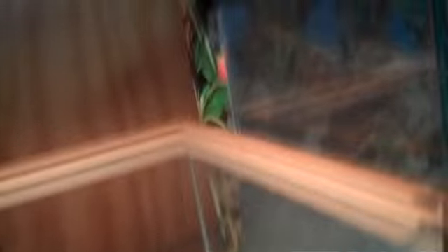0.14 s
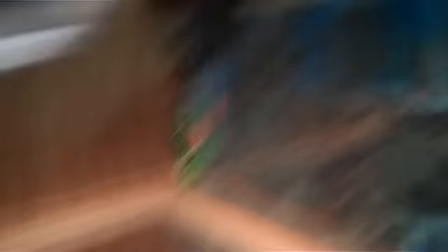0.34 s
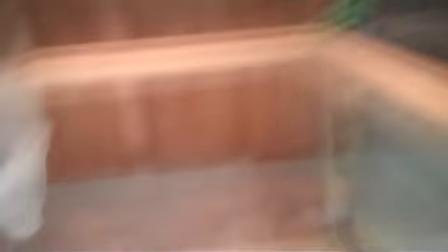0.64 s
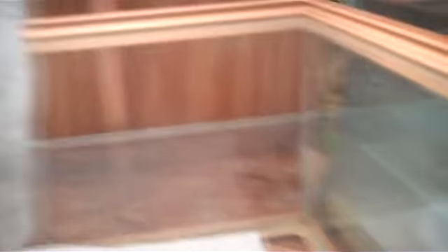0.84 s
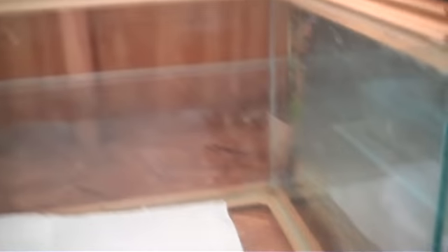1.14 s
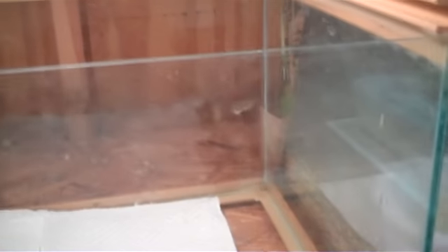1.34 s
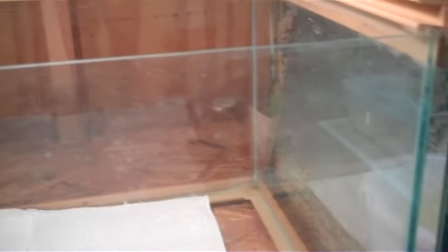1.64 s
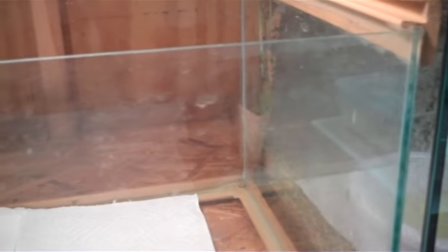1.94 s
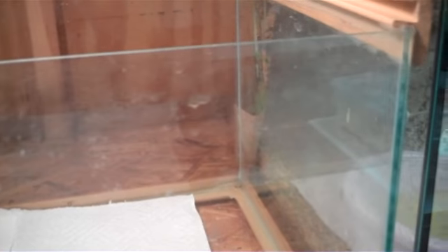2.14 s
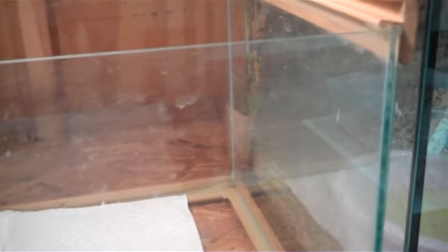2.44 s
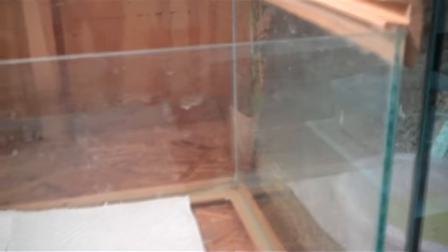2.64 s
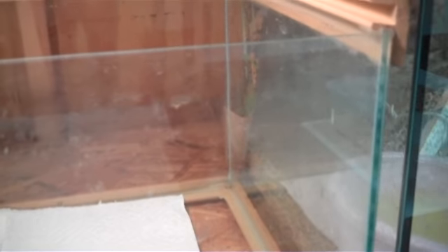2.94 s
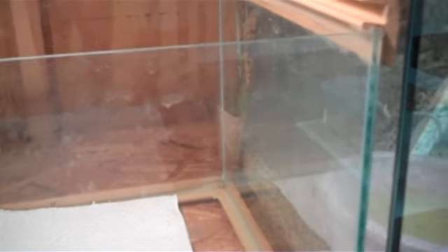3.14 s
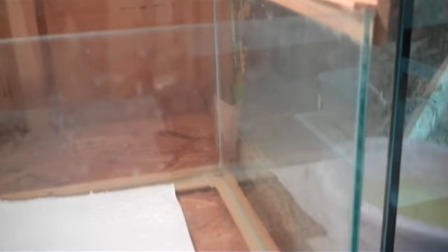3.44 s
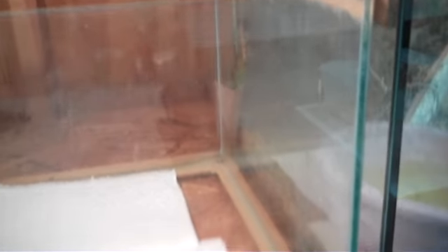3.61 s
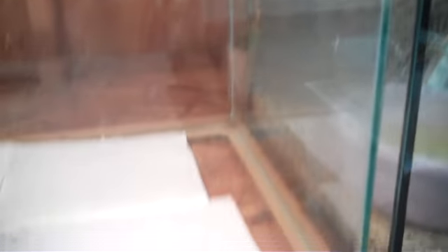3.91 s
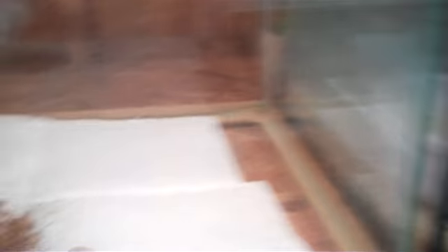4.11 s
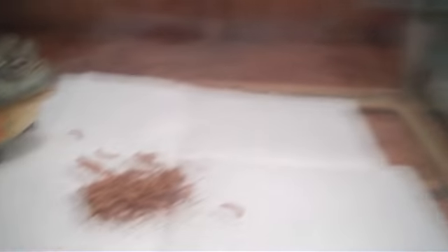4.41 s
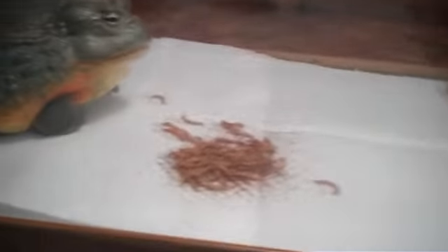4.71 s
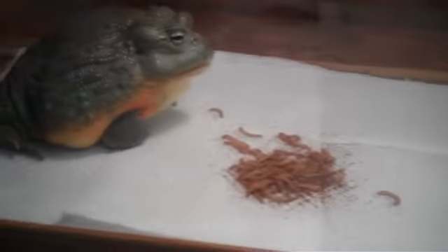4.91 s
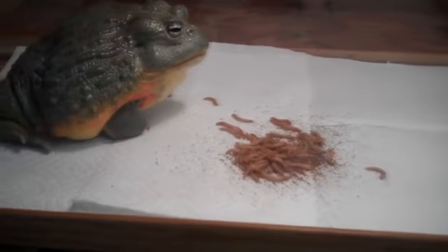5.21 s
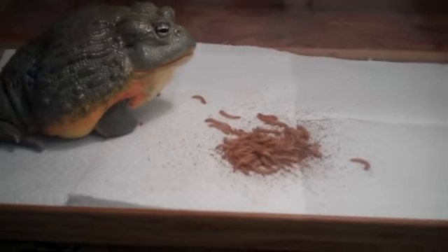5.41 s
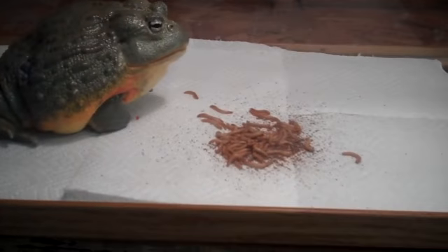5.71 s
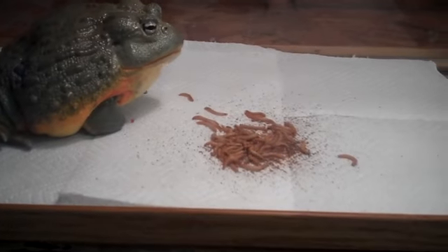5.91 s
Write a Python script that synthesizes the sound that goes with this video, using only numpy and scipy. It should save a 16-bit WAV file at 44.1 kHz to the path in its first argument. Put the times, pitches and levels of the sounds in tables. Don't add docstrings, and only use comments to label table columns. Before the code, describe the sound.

Brittle plastic crackling and soft hollow knocks, a grainy pouring rustle, then a burst of sharp crinkling and crunching close to a small camera.

```python
import sys
import numpy as np
from scipy import signal
from scipy.fft import rfft, irfft
from scipy.io import wavfile
from scipy.ndimage import uniform_filter1d, minimum_filter1d

SR = 44100
rng = np.random.default_rng(int(sys.argv[2]) if len(sys.argv) > 2 else 0)


def ratio(d):
    e = np.asarray(d, float) / 20
    return 10 ** e


def to_wav(s):
    ch = np.atleast_2d(s).T
    pcm = np.round(np.clip(ch, -1, 1) * 32767)
    wavfile.write(sys.argv[1], SR, pcm.astype(np.int16))


N = 267246
SIDES = np.array([[1], [-1]])

# time_s, left_re_right_db
PLACE = [(0, -5.5), (.4, -2.5), (1.2, -0.5), (3.4, -1), (3.75, -1), (4.0, -0.1), (4.4, -2.5), (5.0, -3),
         (6.06, -2.5)]
# time_s, lead_us
LEAD = [(0, 68), (.35, 60), (.6, 10), (3.4, 10), (3.6, 68), (3.8, 66), (3.9, 28), (4.35, 30), (4.42, -8),
        (4.7, -5), (4.75, -35), (4.9, -40), (5.1, 0), (6.06, 0)]
# time_s, rustle_db, dullness_db
FLOW = [(0, -62, -3.5), (.065, -44.5, 5.5), (.29, -43, -2.5), (.36, -47.5, 1), (.52, -51, 1),
        (.88, -51.5, 1), (1.44, -47.5, 0.7), (1.75, -40.5, 1), (2.01, -34.5, 2.5), (2.3, -37.5, 1),
        (2.68, -47.5, -1), (3.4, -56.5, 1.5), (3.63, -44, 5), (4.25, -45.5, 3), (4.8, -35, 6.5),
        (5.5, -41, 4.5), (5.74, -61, 4), (5.98, -71, 3)]


def evened(x):
    return x / np.sqrt(np.mean(x ** 2) + 1e-20)


def read(points, hz):
    f, value = np.transpose(points)
    return np.interp(np.log(hz + 1), np.log(f + 1), value)


def follow(points, s):
    return np.interp(s, *np.transpose(points))


def highpass(x, hz):
    return signal.sosfilt(signal.butter(2, hz, "high", fs=SR, output="sos"), x)


def add(mix, s, sound):
    part = mix[:, round(s * SR):][:, :sound.shape[1]]
    part += sound[:, :part.shape[1]]


def coloured(x, level_db):
    # freq_hz, likeness
    likeness = [(30, .6), (130, .72), (640, .93), (1500, .95), (3100, .68), (6800, .3), (15000, .4)]
    hz, t, z = signal.stft(x, SR, nperseg=512, noverlap=384)
    same = np.clip(read(likeness, hz), -1, 1)[:, None]
    z = np.array([z[0], same * z[0] + np.sqrt(1 - same ** 2) * z[1]])
    z = z * ratio(level_db(hz[:, None], t))
    return signal.istft(z, SR, nperseg=512, noverlap=384)[1][:, :N]


def ring(t, hz, t60, kick):
    mode = ratio(-60 * t / t60) * np.sin(2 * np.pi * hz * t)
    x = np.convolve(kick, mode)[:len(t)]
    return x / abs(x).max()


def arrive(s, sound, lead_us):
    hz = np.fft.rfftfreq(sound.shape[1], 1 / SR)
    shift = np.exp(1j * np.pi * hz * 1e-6 * lead_us * SIDES)
    early = 8
    return s - early / SR, irfft(rfft(np.roll(sound, early, axis=1)) * shift, sound.shape[1])


def snap(s, peak_db, hz, body_db, pan_db):
    t, luck = np.arange(700) / SR, rng.random(3)
    noise = rng.standard_normal((4, len(t)))
    bright = min(0.48 + hz / 7500, 1.2)
    kick = noise[0] * ratio(-60 * t / .0035) * np.minimum(t / .0003, 1)
    brittle = noise[3] * ratio(-60 * t / 0.0022)
    edge = np.diff(kick + 0.94 * brittle, n=2, prepend=[0, 0])
    tick = .12 * bright * edge + .3 * kick + .7 * ring(t, hz, 7.5 / hz, kick[:40])
    body = ring(t, min(hz, 1900 + 1300 * luck[0]), .0024, kick[:30])
    body = body + .4 * ring(t, 1200 + 900 * luck[1], .003, kick[:30])
    thump = ring(t, 600 + 500 * luck[2], 0.01, kick[:30])
    chatter_shape = ratio(-14.0 - 60 * t / 0.015) * np.minimum(t / 0.0008, 1)
    chatter = np.diff(noise[1:3], prepend=0) * bright * chatter_shape
    aim = ratio(.5 * SIDES * pan_db)
    sound = aim * (tick + chatter) + aim ** 0.55 * ratio(body_db - 3.0) * (body + ratio(-13.5) * thump)
    return s - .0006, ratio(peak_db - 4.0) * sound


def effort_db(t):
    # start_s, level_db
    jolts = [(0.174, -34), (0.302, -37.5), (.645, -43.5), (3.487, -48), (3.669, -30), (3.756, -28.5),
             (3.911, -34), (4.26, -35.5), (4.345, -29.5), (5.162, -31), (5.389, -33)]
    # middle_s, level_db, length_s
    squeezes = [(0.762, -49.5, 0.27), (1.02, -43.5, 0.33), (1.203, -54, 0.33), (2.838, -48, 0.18),
                (3.826, -37.5, 0.1), (4.052, -39.5, 0.78), (4.133, -26.5, 0.13), (4.414, -30.5, 0.2),
                (4.523, -32, 0.23), (4.653, -35, 0.053), (4.721, -27.5, 0.16), (4.885, -28, 0.058),
                (5.012, -30.5, 0.1), (5.187, -38.5, 0.78), (5.594, -36, 0.44), (5.845, -39, 0.33),
                (6.06, -42.5, 0.16)]
    rise_s, fall_db_per_s = 0.011, 237
    depth_db = 25
    power = ratio(2 * np.interp(t, *np.transpose(FLOW)[:2]))
    for s, db in jolts:
        onset = np.clip((t - s) / rise_s + 1, 0, 1) ** 2
        power = power + onset * ratio(2 * (db - fall_db_per_s * np.maximum(t - s, 0)))
    for s, db, length in squeezes:
        off_middle = np.minimum(abs(t - s) * 2 / length, 9)
        power = power + ratio(2 * (db - depth_db * off_middle ** 2.22))
    return 10 * np.log10(power)


def creases():
    start_s, creases_per_s = 3.65, 80
    luck = rng.random((400, 4))
    s = start_s + np.cumsum(-np.log(luck[:, 0])) / creases_per_s
    peak_db = effort_db(s) + 0.5 * np.log(luck[:, 1])
    rows = np.transpose([s, peak_db, 2500 + 5000 * luck[:, 2], -25 + 25 * luck[:, 3]])
    return rows[s < N / SR]


def snaps(tub):
    # time_s, snap_peak_db, ring_hz, wall_body_re_snap_db
    buckles = [(.028, -31, 1500, 14.5), (.0555, -37, 2150, 7), (.084, -29, 5670, 7), (.1045, -29, 5950, -17),
               (.1399, -32, 1940, 3), (.17, -10, 6250, -2), (.1827, -9.5, 5960, -1), (.2145, -19, 6800, 3.5),
               (.2526, -28.5, 5800, -17), (.2597, -31.5, 5560, 11.5), (.313, -9.5, 6700, -38),
               (.322, -20, 5000, -18), (.641, -23, 7240, -12), (.6455, -22.5, 7100, -15),
               (.712, -33, 2580, 3), (.9871, -33, 1930, 7.5), (1.11, -29.5, 3730, -34),
               (1.1745, -19, 7140, -1), (1.2942, -27.5, 4600, -8), (1.2975, -32.5, 4300, -5),
               (1.3005, -35.5, 1300, 5), (.9395, -43, 1500, 4), (.913, -43, 1800, 4), (1.663, -35, 2800, 5),
               (1.7373, -35, 1290, 11), (2.0033, -25, 7190, -1), (2.6383, -29.5, 3240, 5),
               (3.2011, -37, 3000, -12),
               (3.486, -28, 2820, 11.5), (3.536, -20, 3440, -32), (3.644, -21.5, 7100, -14),
               (3.668, -21, 7150, -11), (3.751, -35, 4830, 8.5), (3.755, -4, 7000, -42),
               (3.797, -23, 6300, -24), (3.8154, -19, 7700, -27), (3.8735, -25, 7350, -13),
               (3.9076, -9.5, 6740, -39), (3.9967, -12.5, 8060, -37), (4.0321, -19.5, 3350, 3.5),
               (4.045, -13, 8800, -22), (4.0538, -17, 7450, -13), (4.063, -23.5, 2500, 6.5),
               (4.0837, -21, 6760, -7), (4.1045, -14.5, 4400, -8), (4.11, -22.5, 4900, 7),
               (4.142, -13, 4830, -1), (4.187, -15.5, 7850, 1), (4.226, -38, 4850, 3),
               (4.2574, -22, 7440, 0), (4.2788, -15.5, 7500, 1), (4.3095, -23, 7360, 5.5),
               (4.3293, -18.5, 3320, 0), (4.338, -16, 8300, -29), (4.3442, -4, 7760, -16),
               (4.3445, -14, 7130, -15),
               (4.392, -19, 3920, -15), (4.396, -9.5, 3630, -13), (4.4164, -7.5, 3370, -24),
               (4.424, -6.5, 6400, -13), (4.432, -12.5, 8200, 1), (4.4385, -16, 2720, -31),
               (4.465, -27, 4700, -25), (4.4885, -13, 3970, -37), (4.501, -11.5, 5230, -42),
               (4.5161, -12, 5230, -36), (4.5468, -11.5, 5430, -38), (4.557, -10.5, 3000, -26),
               (4.5973, -26, 4570, -1), (4.6097, -22, 7250, -11), (4.644, -17.5, 4230, -31),
               (4.6579, -12, 6000, -42), (4.698, -17, 7900, -4), (4.7267, -20, 1470, 2),
               (4.7512, -16.5, 4700, 4.5), (4.809, -19, 7800, 2.5), (4.8302, -18, 6800, -32),
               (4.8492, -18, 1360, -24), (4.876, -20.5, 5740, -21), (4.918, -36, 5300, -3),
               (4.944, -32, 2580, -4), (4.968, -41, 3500, -12), (4.986, -18, 1420, -23),
                (5.014, -16, 3000, -20), (5.0734, -11, 2480, -30), (5.0803, -16, 6400, -12),
                (5.13, -23.5, 5860, -14), (5.162, -11, 3900, -13), (5.1745, -16, 6040, -26),
                (5.2648, -16.5, 3740, -6), (5.321, -23, 6350, -28), (5.3851, -23.5, 5750, -29),
                (5.3963, -19.5, 3200, -35), (5.4456, -20, 3480, -33), (5.489, -39, 5570, -23),
                (5.564, -27, 5150, -27), (5.6424, -26.5, 5200, -23), (5.8, -24, 4100, -33),
                (5.826, -33, 5700, -30), (5.887, -23, 7400, -6),
               (0.052, -44, 4130.0, -6), (0.248, -21.5, 1030.0, -8), (0.2885, -28, 5510.0, -8),
                (0.307, -23, 5680.0, -20), (0.3106, -17, 6370.0, -4.5), (1.1102, -23.5, 3500, -16),
                (1.3554, -35, 5200, -2), (1.533, -38, 2410.0, -14), (1.5428, -34, 5000.0, -2),
                (1.7428, -23, 3080, -12), (1.9304, -40, 3790.0, -12), (.878, -41, 3000.0, -4),
                (3.014, -38.5, 4310.0, -17), (3.03, -40, 4600.0, -18), (3.4494, -41, 4130.0, -17),
                (3.5357, -25, 3260, -20), (3.546, -30, 4310.0, -6), (3.6442, -29, 6720.0, 0),
                (3.6676, -15.5, 2250, -3.5), (3.6988, -25, 3100.0, -8), (3.8108, -22.5, 3470, -12),
                (4.0311, -19, 3620.0, -24), (4.108, -15, 4800, -4), (4.2275, -31.5, 4820.0, 6),
                (4.3037, -31, 4130.0, -14), (4.322, -21.5, 3960.0, -3), (4.4412, -15, 3620.0, -18),
                (4.457, -25, 4130.0, -12), (4.463, -32, 4480.0, -12), (4.522, -7.5, 2700, -30),
                (4.5631, -20, 4480.0, -10), (4.6211, -35, 5680.0, -12), (4.664, -19, 4900, -12),
                (4.6865, -29, 3300, -8), (4.905, -23, 4050, -12), (4.944, -34, 2600, -10),
                (4.9677, -20, 3470, -13), (5.124, -19.5, 3050, -9), (5.2118, -36, 3270.0, -16),
                (5.2918, -25, 2580.0, -12), (5.396, -31, 2900, -22), (5.4154, -26, 4310.0, -15),
                (5.4344, -21, 3790.0, -19), (5.4887, -25.5, 4480.0, -19), (5.509, -28, 4310.0, -2),
                (5.7637, -38, 4650.0, -1), (5.8622, -41, 3960.0, -12), (5.991, -38, 2980.0, -8)]
    pan_spread_db, lead_spread_us = 2, 12
    for row in [*buckles, *creases()]:
        side = rng.standard_normal()
        sound = snap(*row, follow(PLACE, row[0]) + pan_spread_db * side)
        add(tub, *arrive(*sound, follow(LEAD, row[0]) + lead_spread_us * side))


def needle(s, peak_db):
    t60_s, low_hz = 0.0019, 15100
    t = np.arange(200) / SR
    top = highpass(rng.standard_normal((2, len(t))) * ratio(-60 * t / t60_s), low_hz)
    return s - .0005, ratio(peak_db) * top / abs(top).max()


def needles(tub):
    # time_s, peak_db
    cracks = [(0.1709, -17), (0.1831, -2), (0.215, -19.5), (.641, -18), (1.175, -18), (3.6441, -16),
              (3.67, 0), (3.7564, -15), (3.9984, -14), (4.0445, -7), (4.2796, -26), (4.6095, -22),
              (4.876, -6), (5.6417, -14), (.313, -36), (5.625, -38), (5.655, -28), (5.765, -35),
              (5.778, -37), (4.34, -13), (4.424, -18), (4.501, -15)]
    for row in cracks:
        add(tub, *needle(*row))


def scrape(s, level_db, hz, length):
    sag, q, fade_db, slips_per_s = 0.33, 1.96, -10, 1500
    t = np.arange(3000) / SR
    u = np.minimum(t / length, 1)
    size = ratio(3.7 * rng.exponential(1, len(t)))
    slipping = rng.random(len(t)) < slips_per_s / SR
    slips = rng.standard_normal(len(t)) * (0.29 + size * slipping)
    turn = np.exp(2j * np.pi * np.cumsum(hz * (1 + sag * (.5 - u))) / SR)
    r = np.exp(-np.pi * hz / q / SR)
    x = (turn * signal.lfilter([1], np.convolve([1, -r], [1, -r]), slips / turn)).real
    shape = np.minimum(t / 0.0012, 1) * ratio(fade_db * u - 6100 * np.maximum(t - length, 0))
    return s, ratio(level_db) * evened(x) * shape * np.ones((2, 1))


def scrapes(tub):
    # start_s, level_db, centre_hz, length_s
    drags = [(0.051, -32.5, 2130, 0.02), (0.105, -55, 5670, 0.042), (0.31, -44, 5000, 0.01),
             (0.837, -59.5, 4500, 0.012), (1.655, -44.5, 2580, .025), (1.925, -54, 2400, .02),
             (1.994, -47, 2280, 0.039), (2.075, -46, 2500, .045), (2.17, -45, 2180, 0.059),
             (2.297, -50, 2300, .04), (3.183, -52, 2450, .012), (3.488, -49.5, 2470, 0.024),
             (4.04, -41, 7000, .005), (4.107, -32, 2120, 0.045), (4.15, -34, 5450, 0.0057),
             (4.26, -32, 3460, 0.0091), (4.344, -28.5, 2280, 0.011), (4.41, -34, 3500, .008),
             (4.722, -44, 1410, 0.026), (4.981, -37, 1310, .015), (5.205, -44, 2960, 0.043),
             (5.438, -44, 3000, 0.029), (5.579, -42, 3180, 0.043), (5.821, -48.5, 5570, 0.027),
             (0.224, -55, 5500, .06), (5.05, -40, 1290, 0.055), (5.389, -50, 1270, 0.056)]
    for row in drags:
        add(tub, *arrive(*scrape(*row), follow(LEAD, row[0])))


def rustle():
    # freq_hz, level_db
    grain = [(80, -36), (130, -9), (220, -4), (400, 2.5), (1000, -2.5), (1600, -3.5), (2300, 1), (3200, -1),
             (4300, -1), (5500, -3.5), (7500, -6), (11000, -4.5), (12300, 1), (14400, -3), (15300, -36)]
    # freq_hz, lift_db
    dull = [(600, 0.79), (1500, 1.5), (3500, -0.1), (7000, -0.7), (14000, -2)]
    # freq_hz, level_db
    pouring = [(150, 7.5), (500, 1), (1500, 1), (2250, 1.5), (3300, -2.5), (4400, -1.5), (5700, -5),
               (7500, 2.5), (9000, -0.55)]
    # freq_hz, level_db
    squeezed = [(800, -2.5), (1250, 0.5), (1900, -3), (3300, 2), (5000, -2.5), (7500, 1.5)]
    poured_s = 3.45
    s, _, dull_db = np.transpose(FLOW)
    t = np.arange(N) / SR
    coarse_db = np.interp(t, [3.3, 3.6], [2.2, 3.5])
    size = ratio(coarse_db * np.minimum(rng.exponential(1, N), 4.5))
    clicks = size * (rng.random(N) < 3500 / SR)
    clumps = ratio(2.07 * evened(uniform_filter1d(rng.standard_normal(N), 700)))
    decay = ratio(-120 * np.arange(400) / SR / .0035)
    power = signal.oaconvolve((clicks * clumps) ** 2, decay)[:N]
    power = np.where(t < poured_s, .5, .15) + power / uniform_filter1d(power, 3000)
    x = np.sqrt(abs(power)) * rng.standard_normal((2, N))
    patches = uniform_filter1d(rng.standard_normal((257, N // 128 + 9)), 6, 0)
    patches = evened(uniform_filter1d(patches, 12, 1))

    def field(hz, at_s):
        notes = np.where(at_s < poured_s, read(pouring, hz), read(squeezed, hz))
        dulled = read(dull, hz) * np.interp(at_s, s, dull_db)
        patchy = np.where(at_s < poured_s, 1.8, 2.3) * patches[:, :len(at_s)]
        return read(grain, hz) + notes + dulled + patchy

    level_db = effort_db(t) - 4.0 + .55 * SIDES * follow(PLACE, t)
    return coloured(x, field) * ratio(level_db)


def knock(s, peak_db, hz, cycles=12):
    t = np.arange(2600) / SR
    push = np.sin(2 * np.pi * hz * t[:130]) + .2 * rng.standard_normal(130)
    push = push * np.hanning(130)
    sound = ring(t, hz, cycles / hz, push) + 1.24 * ring(t, 1.8 * hz, 6 / hz, push)
    return s + 0.00614, ratio(peak_db - 5.0 - 0.38 * follow(PLACE, s) * SIDES) * sound


def knocks(low):
    # time_s, peak_db, ring_hz
    blows = [(0.0205, -25, 620), (0.109, -36, 700), (0.0765, -22.5, 770), (0.126, -30.5, 980),
             (0.176, -17.5, 890), (0.187, -40, 900), (0.209, -22.5, 890), (0.25, -24.5, 284),
             (0.26, -27, 234), (0.306, -34.5, 122), (0.53, -34, 620), (0.706, -37, 1160),
             (0.934, -32.5, 746), (0.979, -37, 1160), (1.073, -39, 640), (1.168, -32.5, 660),
             (1.3, -43, 685), (1.732, -46, 1070), (1.828, -41, 656), (2.06, -31.5, 596), (2.19, -42, 1940),
             (2.13, -31, 393), (2.2, -34.5, 614), (2.33, -33, 413), (2.569, -37.5, 530),
             (3.477, -28.5, 790), (3.657, -45, 1110), (3.75, -54, 1090), (3.9, -33, 710), (4.263, -28, 800),
             (4.428, -50, 1100), (4.558, -49, 816), (4.731, -38, 1110), (5.153, -30, 1050)]
    # time_s, peak_db, ring_hz, ring_cycles
    booms = [(0.021, -32.5, 262, 6.7), (0.08, -35, 298, 6), (0.165, -23.5, 1460, 9), (2.089, -46, 151, 10),
             (2.22, -48, 161, 10), (2.343, -34, 735, 82), (1.828, -47, 675, 32), (2.022, -32.5, 700, 22),
             (4.721, -30, 1300, 40), (4.99, -42, 1340, 40), (5.049, -35, 1280, 40)]
    for row in [*blows, *booms]:
        add(low, *knock(*row))


def tank(x):
    # freq_hz, t60_s
    tank_decay = [(300, 0.087), (1500, 0.038), (5000, 0.046), (12000, 0.016)]
    taps = np.zeros((2, 8192))
    places = np.arange(60, 8160, 20) + rng.integers(0, 20, (2, 405))
    np.put_along_axis(taps, places, rng.choice([-1., 1.], places.shape), 1)
    hz, t, z = signal.stft(taps, SR, nperseg=128)
    tail = signal.istft(z * ratio(-60 * t / read(tank_decay, hz)[:, None]), SR, nperseg=128)[1]
    return signal.fftconvolve(x, tail / np.linalg.norm(tail[0]), axes=1)[:, :N]


def room_tone():
    # time_s, level_db
    hands = [(0, -58.5), (.05, -58.5), (.18, -38.5), (.31, -51), (.42, -59.5), (.9, -56.5), (1.5, -59.5),
             (2.2, -57), (2.5, -61), (3.1, -60.5), (3.6, -57), (3.9, -53), (4.15, -51), (4.36, -53),
             (4.43, -54.5), (4.52, -58.5), (5.3, -63), (6.06, -57.5)]
    # freq_hz, density_db_per_hz
    hum = [(15, -57), (35, -19), (75, 0.5), (160, -5.5), (250, 5), (340, 2.5), (430, -3.5), (700, -6),
           (1500, -16.5), (4000, -53)]
    t = np.arange(N) / SR
    lumps = uniform_filter1d(rng.standard_normal(N // 128 + 9), 12)
    lumps = evened(uniform_filter1d(lumps, 8))

    def field(hz, at_s):
        return read(hum, hz) + 3.5 * lumps[:len(at_s)] * (hz < 300)

    x = coloured(rng.standard_normal((2, N)), field)
    return evened(x) * ratio(follow(hands, t) + 5.5 - 0.7 * follow(PLACE, t) * SIDES)


def air():
    level_db, low_hz = -72, 9500
    return ratio(level_db) * highpass(rng.standard_normal((2, N)), low_hz)


def scene():
    tub, low = np.zeros((2, 2, N))
    snaps(tub)
    needles(tub)
    scrapes(tub)
    knocks(low)
    tub = low + highpass(tub, 450)
    return tub + ratio(-10) * tank(tub) + rustle() + room_tone() + air()


def causal(points):
    log_gain = np.log(ratio(read(points, abs(np.fft.fftfreq(4096, 1 / SR)))))
    return np.fft.ifft(np.exp(np.conj(signal.hilbert(log_gain)))).real[:2048]


def microphones(dry):
    # freq_hz, gain_db
    left_port = [(30, -1.5), (300, -10.5), (2500, 2.5), (4500, 4.5), (6200, 14), (7400, 19), (8800, 9.5),
                 (11000, 0.5), (14000, -8.5), (16500, -17.5)]
    # freq_hz, gain_db
    right_port = [(30, -0.5), (300, -11.5), (2500, 0), (4500, 10), (5800, 15.5), (7000, 8.5), (8800, 0),
                  (11000, -8), (14000, -43.5), (16500, -43.5)]
    # freq_hz, gain_db
    side_gain = [(150, -2), (500, -1.5), (1400, -0.5), (2000, -4.5), (2800, 0.5)]
    ports = np.array([causal(left_port), causal(right_port)])
    heard = highpass(signal.oaconvolve(dry, ports, axes=1)[:, :N], 48)
    side = (heard[0] - heard[1]) / 2
    lost = side - irfft(rfft(side) * ratio(read(side_gain, np.fft.rfftfreq(N, 1 / SR))), N)
    return heard - lost * SIDES


def masked(x):
    quiet_db = -90
    hz, t, z = signal.stft(x, SR, nperseg=512, noverlap=384)
    hz = hz[:, None]
    power = (abs(z) ** 2).mean(0)
    nearby_db = -minimum_filter1d(-10 * np.log10(power.sum(0) + 1e-12), size=9)
    band = uniform_filter1d(uniform_filter1d(power, size=9, axis=0), size=3, axis=1)
    band_db = 10 * np.log10(band + 1e-16)
    audible = band_db > np.maximum(.8 * (nearby_db + 40) - 83.0, quiet_db)
    keep = (hz < 9000) | ((hz < 16300) & audible)
    return signal.istft(z * keep, SR, nperseg=512, noverlap=384)[1][:, :N]


def band_limit(x):
    return signal.sosfilt(signal.butter(12, 16500, fs=SR, output="sos"), x)


def record(dry):
    heard = microphones(dry)
    heard = .7 * np.tanh(heard / .7)
    heard = masked(heard)
    return band_limit(heard)


dry = scene()
out = record(dry)
to_wav(out)
```